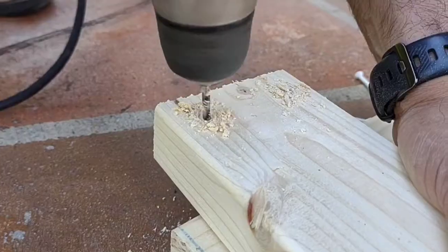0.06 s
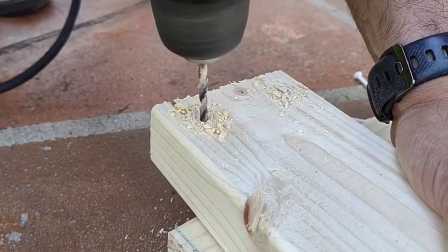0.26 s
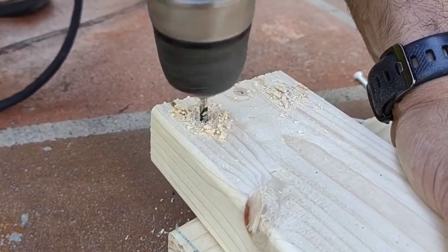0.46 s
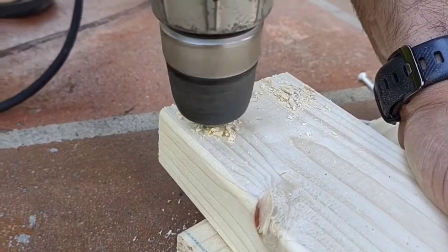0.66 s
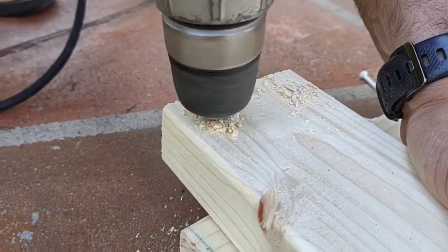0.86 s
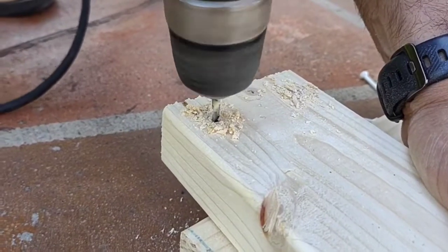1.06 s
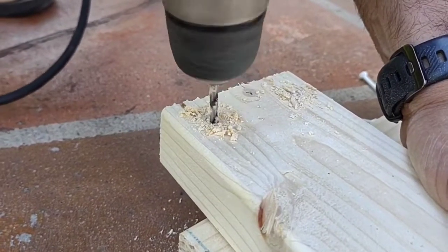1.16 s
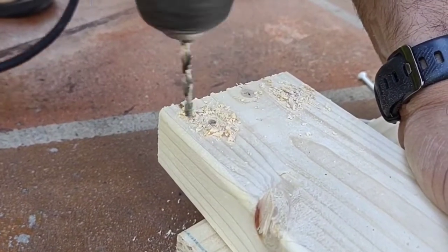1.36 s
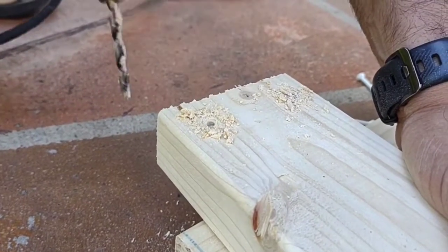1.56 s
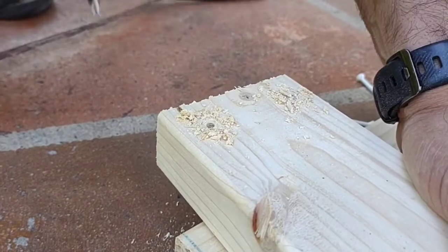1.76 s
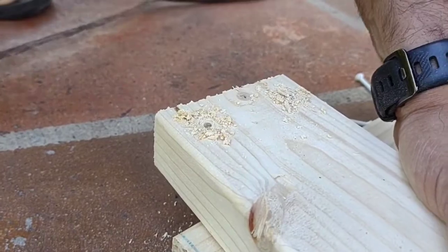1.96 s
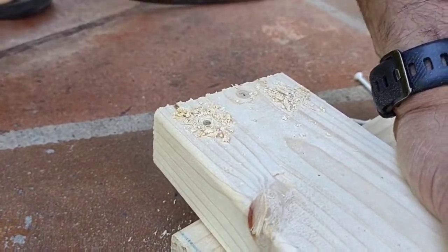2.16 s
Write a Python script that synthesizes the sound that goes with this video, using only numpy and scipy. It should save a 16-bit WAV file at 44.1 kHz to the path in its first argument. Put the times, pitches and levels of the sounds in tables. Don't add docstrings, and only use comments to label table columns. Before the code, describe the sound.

A corded power drill with whistling fan, singing gears and scraping brushes runs hard, coasts lower, gets a quick burst of power, then coasts down and recedes; quiet open-air background, close stereo pickup.

```python
import sys
import numpy as np
from scipy import signal
from scipy.fft import rfft, irfft, next_fast_len
from scipy.io import wavfile
from scipy.ndimage import uniform_filter1d, map_coordinates

SR = 44100
rng = np.random.default_rng(int(sys.argv[2]) if len(sys.argv) > 2 else 0)


def voltage_ratio(decibels):
    exponent = np.asarray(decibels, float) / 20
    return 10 ** exponent


def generate_wav(sig):
    pcm = np.round(np.clip(np.atleast_2d(sig).T, -1, 1) * 32767).astype(np.int16)
    wavfile.write(sys.argv[1], SR, pcm)


N = 97020
T = np.arange(N) / SR
TOP_HZ = 16100


def unit(x):
    return x / np.sqrt(np.mean(x ** 2) + 1e-20)


def along(points, hz):
    f, v = np.transpose(points)
    return np.interp(np.log(hz + 1), np.log(f + 1), v)


def over_time(points):
    return np.interp(T, *np.transpose(points))


def wobble(rate):
    coarse = T[::64]
    curves = [map_coordinates(knots, [coarse * rate]) for knots in rng.standard_normal((2, 200))]
    return np.array([np.interp(T, coarse, curve) for curve in curves])


def filtered(x, response):
    m = next_fast_len(N + SR // 4)
    return irfft(rfft(x, m) * response(np.fft.rfftfreq(m, 1 / SR)), m)[..., :N]


def ring(peaks, f, base):
    return base + sum(voltage_ratio(db) * f * w / np.hypot(c * c - f * f, f * w) for c, w, db in peaks)


def port_delay(hz, ms):
    return np.exp(np.outer([1j, -1j], np.pi * hz * ms / 1000))


# frequency in Hz, left-right likeness from 0 to 1.
LIKENESS = [(40, 0.47), (100, 0.99), (200, 0.91), (400, 1), (770, 0.7), (1500, 0.62), (2700, 0.12),
            (6000, 0.1)]
# frequency in Hz, left over right in dB.
BALANCE = [(500, 0.9), (1100, 2), (1700, 2.5), (2500, -0.5), (6000, -1.5), (9000, 3), (13000, 0)]


def rush(colour, patchy_db):
    z = signal.stft(rng.standard_normal((2, N)), nperseg=512)[2]
    field = uniform_filter1d(rng.standard_normal(z.shape[1:]), size=5, axis=0)
    field = uniform_filter1d(field, size=8, axis=1)
    pair = signal.istft(z * voltage_ratio(patchy_db * unit(field)), nperseg=512)[1][:, :N]

    def mid_side(hz):
        angle = np.arccos(np.clip(along(LIKENESS, hz), -1, 1)) / 2
        return colour(hz) * [np.cos(angle), np.sin(angle)]

    def placing(hz):
        return voltage_ratio(np.outer([.5, -.5], along(BALANCE, hz))) * port_delay(hz, ms=.11)

    mid, side = filtered(pair, mid_side)
    return unit(filtered(np.array([mid + side, mid - side]), placing))


# time in seconds, level in dB.
SHAKING = [
    (.2, -7),
    (.5, -4),
    (.7, 10.5),
    (1.0, -2),
    (1.25, -2),
    (1.5, 4.5),
    (1.8, 2.5),
    (2.15, 0.5),
]


def shake_db():
    return over_time(SHAKING)


# frequency in Hz, level in dB per Hz.
RUMBLE_COLOUR = [(15, -47), (35, -31), (60, -8), (100, 5.5), (160, -0.5), (250, 1.5), (500, -9.5),
                 (1200, -16)]


def distant_rumble():
    level_db = -65.5 + shake_db() + 1.5 * wobble(8.3)[0]
    return voltage_ratio(level_db) * rush(lambda f: voltage_ratio(along(RUMBLE_COLOUR, f)), patchy_db=1.5)


def mains_hum():
    return voltage_ratio(-80 + 2 * wobble(6.5)[0]) * np.sin(2 * np.pi * 245 * T)


def speed():
    release_s, power_on_s, power_off_s = .2905, .8068, 1.0265
    free_rps, spinup_s = 416.3, .1632
    drag_per_s, rub_rps = 0.98, 74
    grip_s, grip_rps2 = 1.73, 13

    def coast(rps, s):
        return (rps + rub_rps) * np.exp(-drag_per_s * s) - rub_rps

    first = coast(free_rps, np.clip(T, release_s, power_on_s) - release_s)
    powered_s = np.clip(T - power_on_s, 0, power_off_s - power_on_s)
    burst = free_rps - (free_rps - first[-1]) * np.exp(-powered_s / spinup_s)
    last = coast(burst, np.maximum(T - power_off_s, 0)) - grip_rps2 * np.maximum(T - grip_s, 0)
    return np.where(T < power_on_s, first, last)


# frequency in Hz, level in dB per Hz.
HUM_COLOUR = [(40, -63), (100, -23.5), (170, -9), (250, -4), (400, 0.5), (600, -16), (1100, -50)]


def body_hum(slow_db):
    level_db = -26.5 + 0.24 * slow_db + 0.27 * shake_db()
    return rush(lambda f: voltage_ratio(along(HUM_COLOUR, f)), patchy_db=1.5) * voltage_ratio(level_db)


# frequency in Hz, level in dB per Hz.
AIR_COLOUR = [(150, -84), (500, -17), (780, -7), (1300, -12), (2000, -7), (5000, -12), (8000, -12.5),
              (15000, -58)]
# frequency in Hz, width in Hz, level in dB.
HOUSING_PEAKS = [(1083, 105, 2), (1530, 122, -1.5), (2317, 24, -10.5), (3025, 100, -3), (3500, 170, -12),
                 (4070, 185, -9), (4770, 240, -3.5), (5600, 160, -0.5)]


def cooling_air(slow_db):
    level_db = -1.75 + 1.0 * slow_db + 0.5 * wobble(13.9)[0]
    return rush(lambda f: voltage_ratio(along(AIR_COLOUR, f)) * ring(HOUSING_PEAKS, f, 0.062), patchy_db=1.2) * voltage_ratio(level_db)


def bar_chop(turns):
    return 1 + 0.089 * np.cos(2 * np.pi * turns) + 0.042 * np.cos(24 * np.pi * turns)


# frequency in Hz, level in dB per Hz.
SCRAPE_COLOUR = [(800, -42), (3000, -10), (4800, -9.5), (6200, -1.5), (7500, -4.5), (9000, -11.5),
                 (15000, -19.5), (16300, -56.5)]


def brush_scrape(turns, slow_db):
    level_db = -0.5 + 0.02 * slow_db + 0.11 * wobble(7.2)[0]
    return rush(lambda f: voltage_ratio(along(SCRAPE_COLOUR, f)), patchy_db=1.0) * bar_chop(turns) * voltage_ratio(level_db)


# frequency in Hz, level in dB per Hz.
SIZZLE_COLOUR = [(4000, -79.5), (9000, 3.5), (11000, -0.5), (12500, -1), (13800, 6), (14700, -3.5),
                 (15600, -8), (16200, -48)]


def brush_sizzle(turns, slow_db):
    lift_s, lift_takes_s, open_db = 1.23, 0.16, 5.5
    lifted = np.clip((T - lift_s) / lift_takes_s, 0, 1)
    spit_db = 1.6 * wobble(40)[0]
    level_db = -12.5 - 1.0 * slow_db + open_db * lifted + spit_db
    return rush(lambda f: voltage_ratio(along(SIZZLE_COLOUR, f)), patchy_db=0.5) * bar_chop(turns) * voltage_ratio(level_db)


def sing(turns, rps, multiple):
    return np.sin(2 * np.pi * multiple * turns) * (multiple * rps < TOP_HZ)


# multiple of shaft speed, left level in dB, right level in dB.
SQUEALS = [
    (72, -4, -14),
    (84, -6, -14),
]
# frequency in Hz, width in Hz, level in dB.
VENT_PEAK = [(9300, 1300, 0)]


def brush_squeal(turns, rps):
    out = np.zeros((2, N))
    for k, left_db, right_db in SQUEALS:
        level_db = np.c_[[left_db, right_db]] + 2.4 * wobble(20)
        out += voltage_ratio(level_db) * ring(VENT_PEAK, k * rps, 0) ** 2 * sing(turns, rps, k)
    return out


# multiple of shaft speed, left level in dB, right level in dB,
# dB lost per dB of slowing, unsteadiness in dB.
SHAFT_TONES = [
    (1, -4.5, -4.5, 4.5, 2),
    (7.7, -22, -15, 6, 4),
    (12, -24, -16, 4, 4),
    (13, -16, -12, 2.5, 3),
    (13.5, -24, -22, -2.2, 1.5),
    (18.5, -30, -23, -.5, 4),
    (24, -13, -12, .8, 3),
    (26.5, -22, -15, 4, 3),
    (36, -16, -15, 0, 3),
    (48, -17, -19, 1.5, 3),
]
# frequency in Hz, level in dB.
CASE_RADIATION = [(200, -7), (400, 0), (900, -9), (1100, 0), (7500, 0), (9000, -7), (12000, -14)]
# frequency in Hz, width in Hz, level in dB.
CASE_PEAKS = [(1310, 400, -11), (1664, 45, -2), (2218, 72, 6), (3120, 244, -1), (4640, 660, -3),
              (6204, 230, 4), (7400, 270, -19), (9100, 320, -35)]


def shaft_tones(turns, rps, slow_db):
    out = np.zeros((2, N))
    for k, left_db, right_db, slope, shaky_db in SHAFT_TONES:
        level_db = np.c_[[left_db, right_db]] + slope * slow_db + along(CASE_RADIATION, k * rps)
        level_db = level_db + shaky_db * wobble(23.62)
        out += voltage_ratio(level_db) * ring(CASE_PEAKS, k * rps, 0.23) ** 1.61 * sing(turns, rps, k)
    return out


# frequency in Hz, level in dB.
WHISTLE_PORTS = [
    [(5700, -14.5), (6400, -9), (8400, 5), (9200, -7), (10500, -1), (13500, -2.5), (14500, -6.5),
     (15400, -1)],
    [(5700, -30), (6500, -12), (7700, -2), (8700, -6), (10500, -12), (11400, -0.5), (12700, 1.5),
     (15000, 3)],
]


def blade_whistle(turns, rps):
    blades = 39
    flutter_db = 2.5 * wobble(30)
    level_db = [along(port, blades * rps) for port in WHISTLE_PORTS] + flutter_db
    return voltage_ratio(level_db) * np.sin(2 * np.pi * blades * turns)


# delay in ms, gain.
PORT_BOUNCES = [
    [(1.1, 0.54), (2.3, -0.6), (4.1, -0.47)],
    [(.8, 0.028), (1.9, 0.43), (3.4, 0.69)],
]


def bounced(tones):
    def bounce(hz, ms, gain):
        bass_loss = 1 + (900 / (hz + 1)) ** 2
        treble_loss = np.hypot(1, hz / 7000)
        return gain * np.exp(-2j * np.pi * hz * ms / 1000) / bass_loss / treble_loss

    def paths(hz):
        ports = [1 + sum(bounce(hz, ms, gain) for ms, gain in port) for port in PORT_BOUNCES]
        return np.array(ports) * port_delay(hz, ms=.02)

    return filtered(tones, paths)


# time in seconds, level in dB.
CLOSENESS = [(.2, -31), (.32, -31.5), (.43, -30.5), (.51, -33), (.61, -30.5), (.76, -31.5), (.88, -29),
             (1.06, -29.5), (1.22, -29.5), (1.3, -31), (1.41, -32), (1.5, -31.5), (1.62, -34.5),
             (1.76, -40.5), (1.85, -41), (2.02, -45), (2.045, -50.5), (2.15, -54)]


def drill():
    rps = speed()
    turns = np.cumsum(rps) / SR
    slow_db = 20 * np.log10(np.minimum(rps / 230, 1))
    noises = body_hum(slow_db) + cooling_air(slow_db)
    noises = noises + brush_scrape(turns, slow_db) + brush_sizzle(turns, slow_db)
    tones = brush_squeal(turns, rps) + shaft_tones(turns, rps, slow_db) + blade_whistle(turns, rps)
    return voltage_ratio(over_time(CLOSENESS)) * (bounced(tones) + noises)


def scene():
    return distant_rumble() + mains_hum() + drill()


# frequency in Hz, level in dB per Hz.
HISS_COLOUR = [(15, -53.5), (25, -8.5), (92, -5), (293, -12.5), (677, -18), (3820, -19), (12500, -23.5),
               (15800, -11.5)]


def recorder_hiss():
    return voltage_ratio(-73) * rush(lambda f: voltage_ratio(along(HISS_COLOUR, f)), patchy_db=1)


def roll_off(x):
    return signal.sosfilt(signal.butter(12, 16200, fs=SR, output="sos"), x)


# time in seconds, level in dB.
GATE_LEVEL = [
    (.19, -110),
    (.1945, -40),
    (.1962, -15),
    (.1985, 0.5),
    (2.155, -1),
    (2.159, -11.5),
    (2.169, -33),
    (2.176, -39),
]
# frequency in Hz, level in dB.
RECORDER_RESPONSE = [(20, -8.5), (45, 2.5), (70, 1), (14600, 0), (15500, -1), (15850, -5), (16100, -40)]


def record(dry):
    gated = dry * voltage_ratio(over_time(GATE_LEVEL))
    mix = filtered(gated + recorder_hiss(), lambda hz: voltage_ratio(along(RECORDER_RESPONSE, hz)) * (hz < TOP_HZ))
    return roll_off(mix)


dry = scene()
out = record(dry)
generate_wav(out)
```